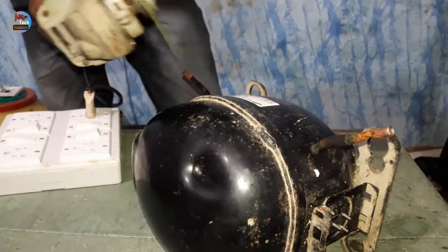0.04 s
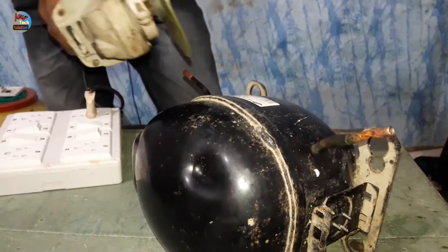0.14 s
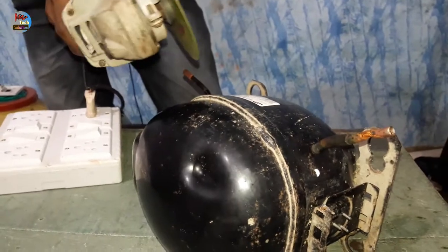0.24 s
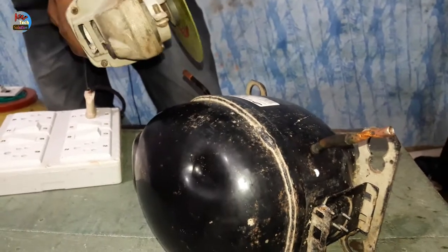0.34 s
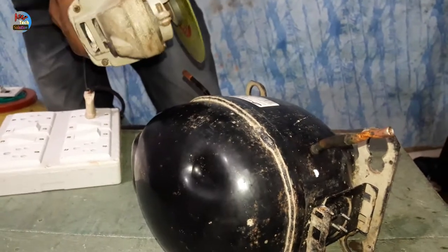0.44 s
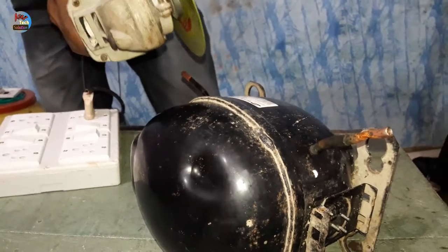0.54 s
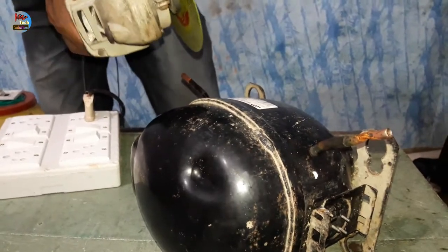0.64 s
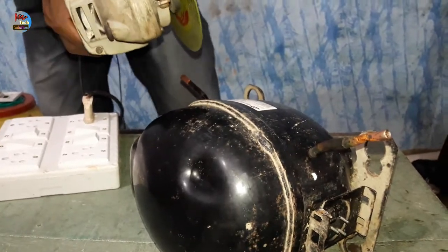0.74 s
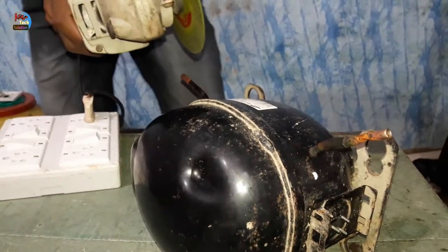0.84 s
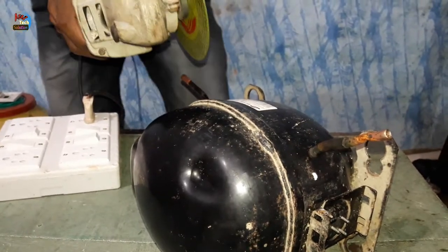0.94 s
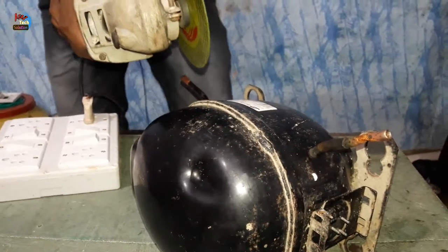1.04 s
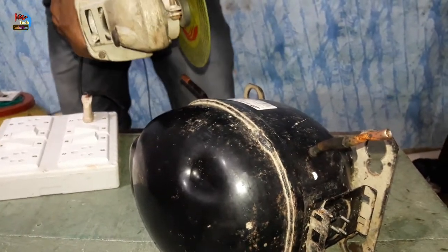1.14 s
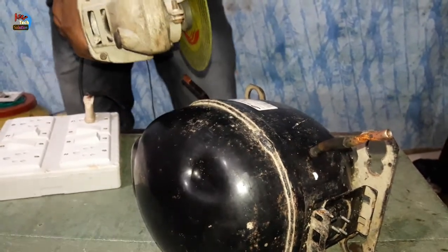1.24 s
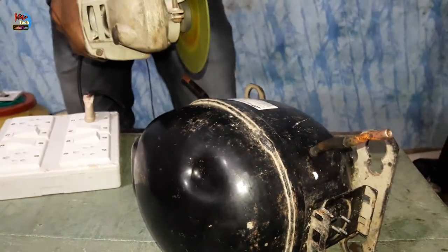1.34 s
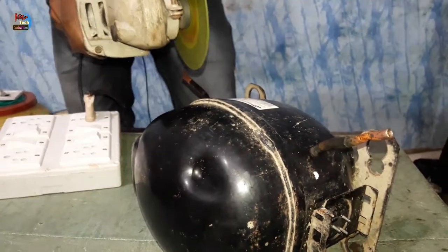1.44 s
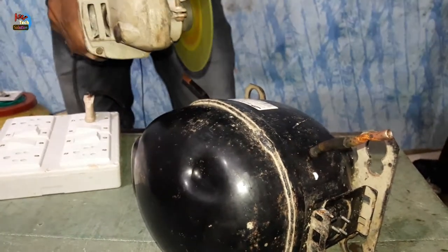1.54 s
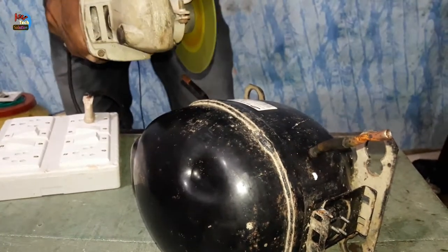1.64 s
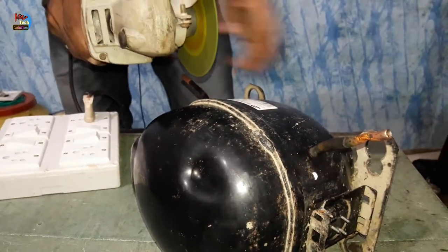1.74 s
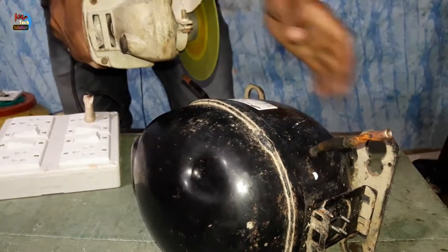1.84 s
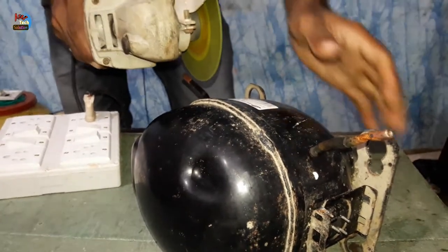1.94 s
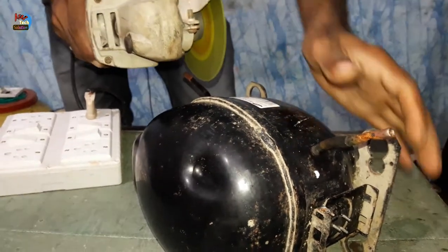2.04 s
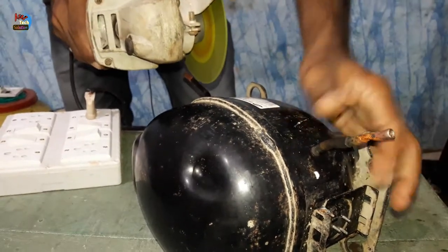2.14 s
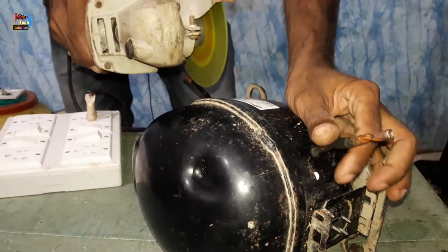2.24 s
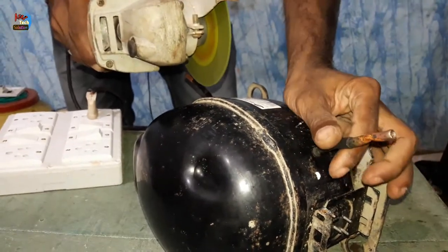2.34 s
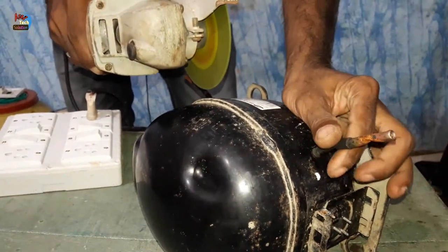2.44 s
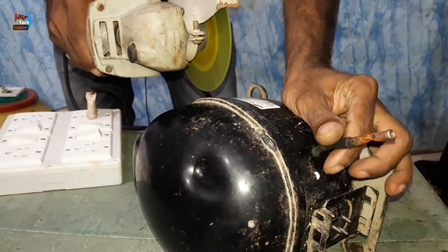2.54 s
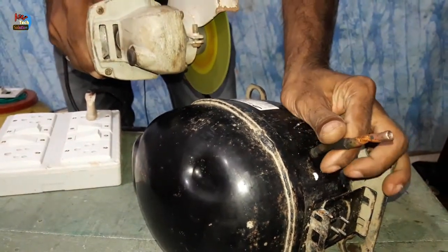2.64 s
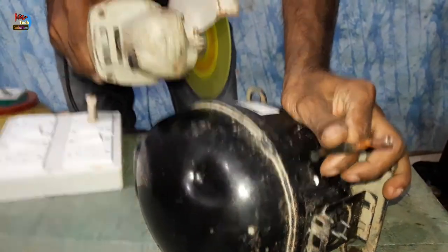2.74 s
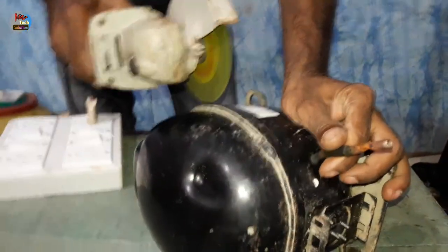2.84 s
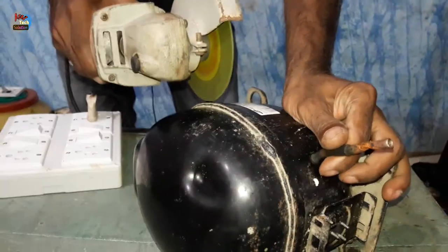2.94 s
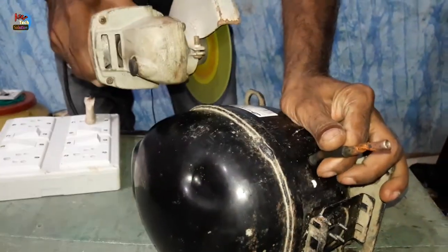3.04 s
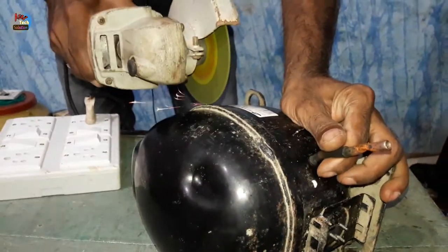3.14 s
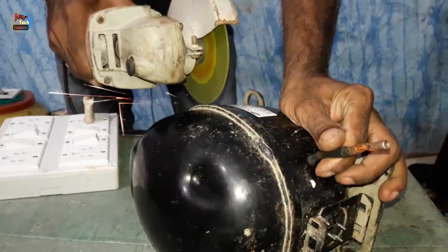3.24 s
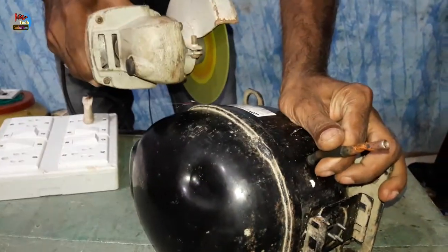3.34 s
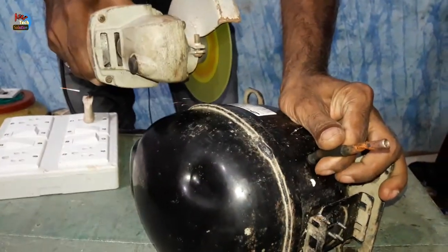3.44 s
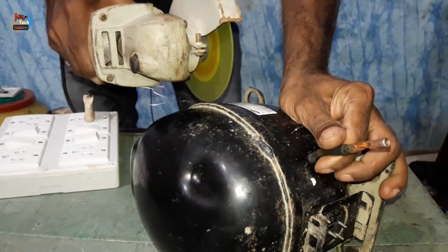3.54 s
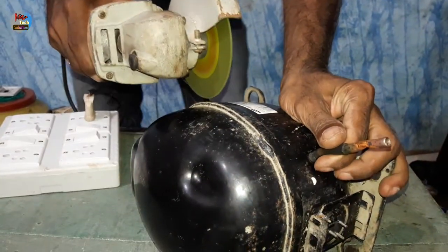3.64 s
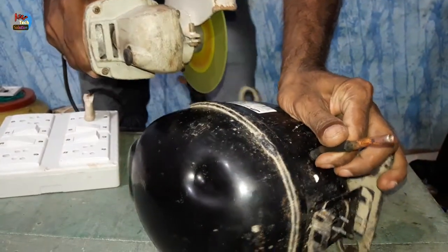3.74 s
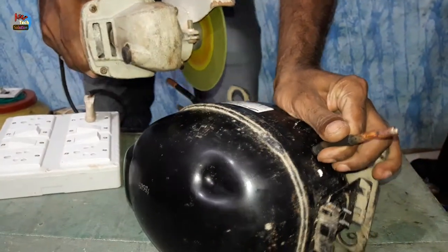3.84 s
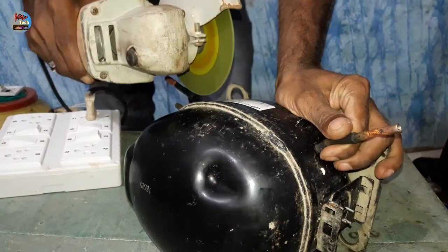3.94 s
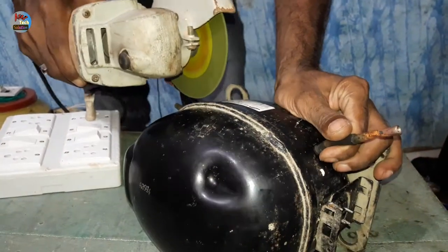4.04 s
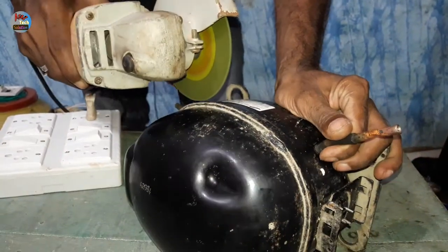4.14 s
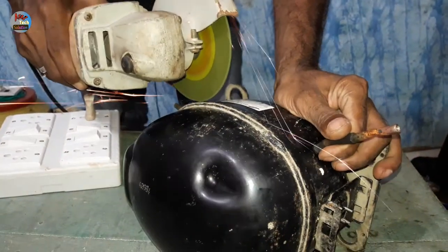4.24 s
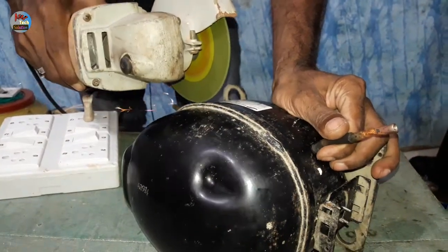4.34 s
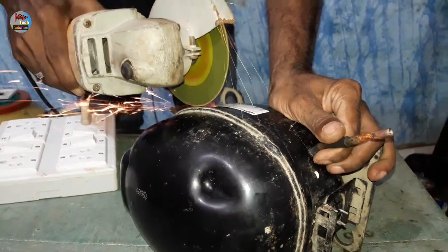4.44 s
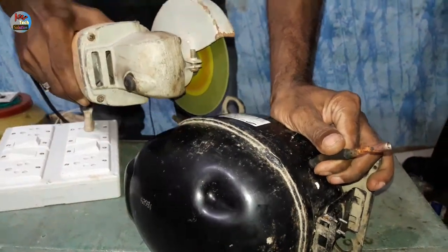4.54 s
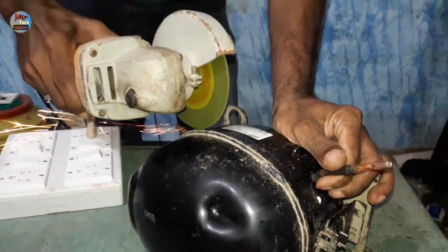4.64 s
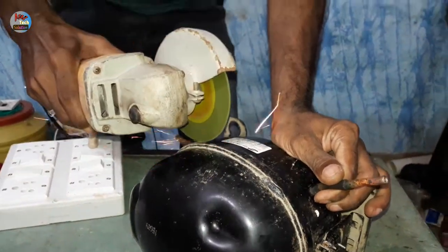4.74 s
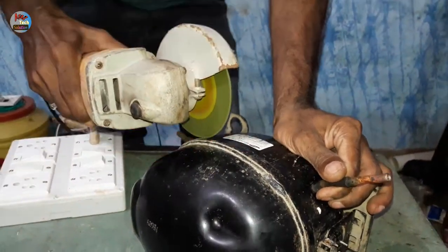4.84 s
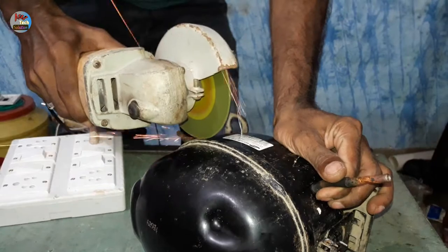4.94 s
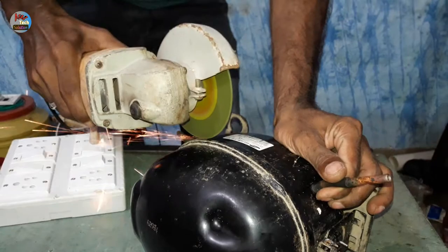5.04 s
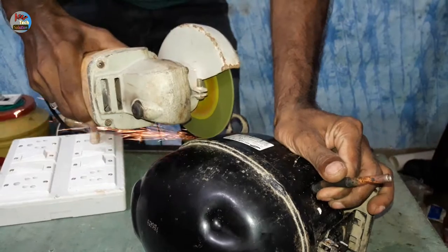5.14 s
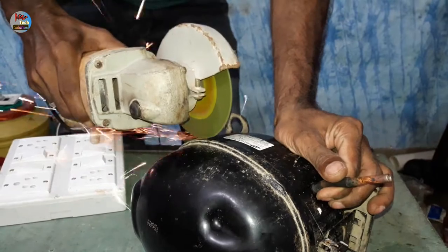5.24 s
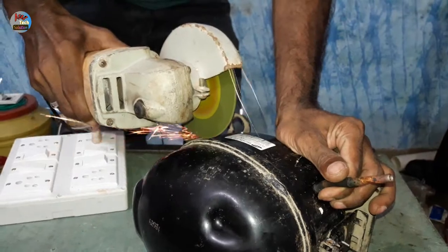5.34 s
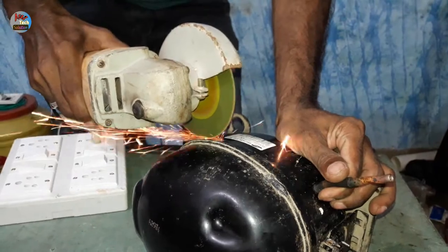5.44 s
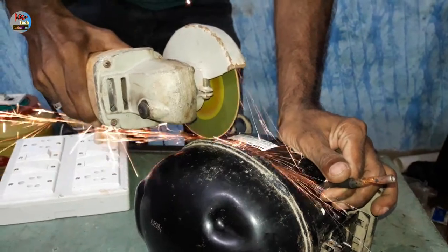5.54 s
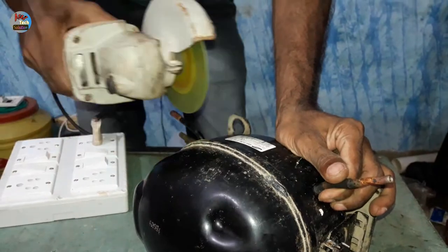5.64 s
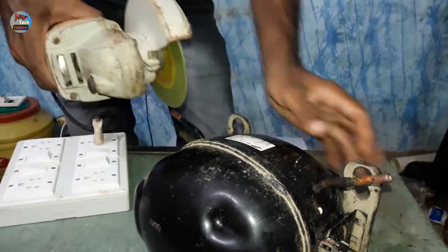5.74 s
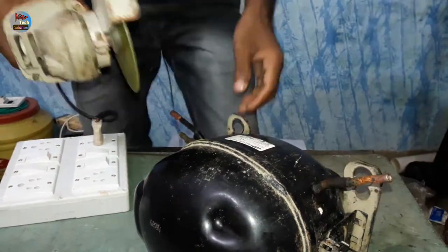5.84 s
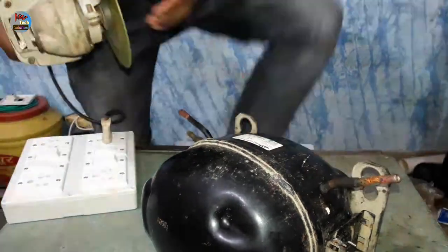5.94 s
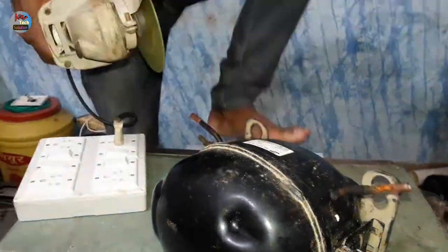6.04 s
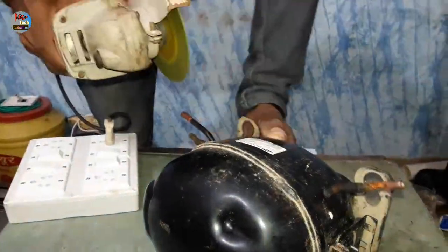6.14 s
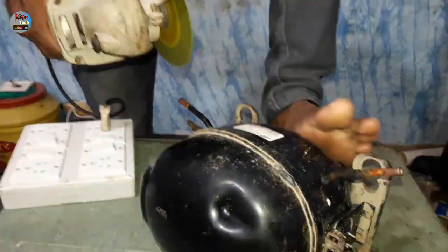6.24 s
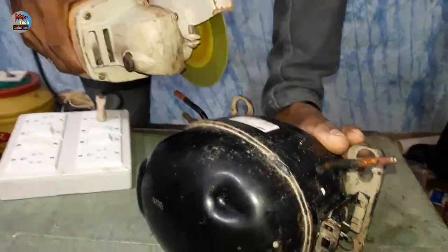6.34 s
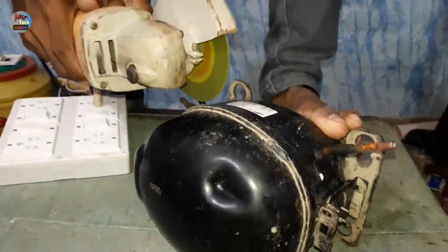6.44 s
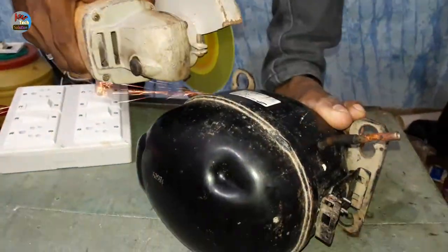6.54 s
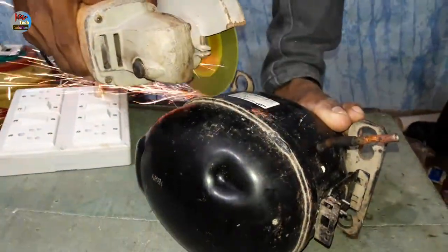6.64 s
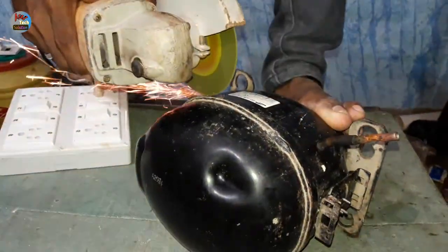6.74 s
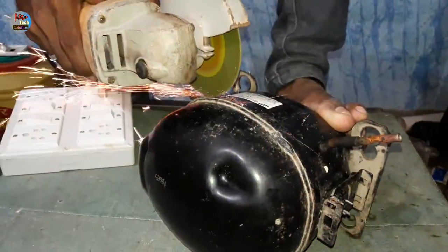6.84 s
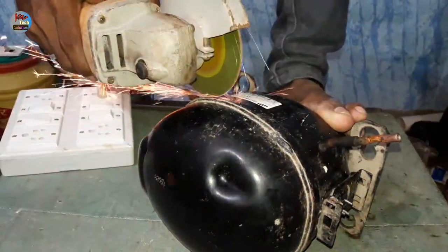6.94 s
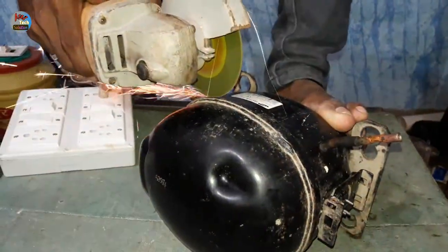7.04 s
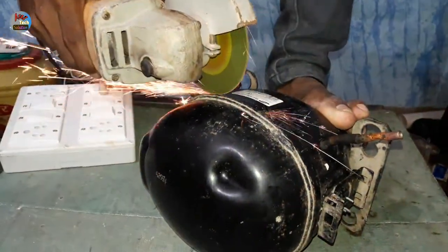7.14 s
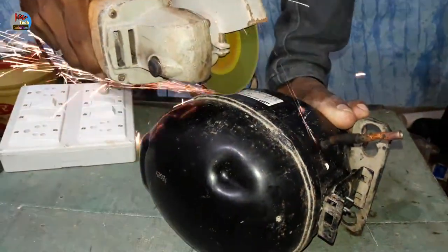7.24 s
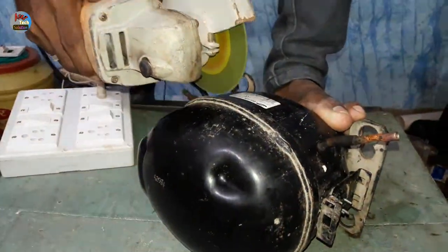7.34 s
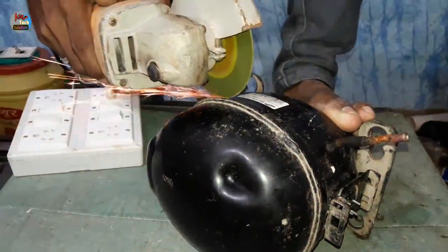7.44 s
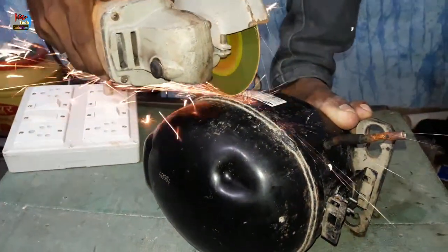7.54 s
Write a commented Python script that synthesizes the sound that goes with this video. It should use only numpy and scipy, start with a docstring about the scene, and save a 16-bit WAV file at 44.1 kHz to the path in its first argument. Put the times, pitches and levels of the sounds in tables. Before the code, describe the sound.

In a humming room, an angle grinder snarls awake, whines freely, chirps and bumps, then grazes and finally grinds harshly into a thick steel shell.

```python
"""On a workbench in a humming room, small knocks are heard, then an angle grinder starts over a thick steel shell.
The motor snarls at about 100 Hz and spins up to a whine made of sines, in a rush of filtered noise from fan and gears.
The gears chirp in short noise bursts. The disc grazes the shell, then cuts deep: random grit rings the steel,
and the motor sags under the load. An echo off the shell colours the rush as the tool moves.
Once, the level dips almost to nothing for an instant."""
import sys
import numpy as np
from scipy import signal
from scipy.fft import rfft, irfft
from scipy.io import wavfile
from scipy.ndimage import map_coordinates

SR = 44100
rng = np.random.default_rng(int(sys.argv[2]) if len(sys.argv) > 2 else 0)


def wrap_up_sound(samples):
    """Save the sound to the file named by the first command line argument, as 16-bit audio."""
    columns = np.atleast_2d(samples).T
    # keep every value between -1 and 1, then stretch to whole-number steps
    tamed = np.clip(columns, -1, 1)
    steps = np.round(tamed * 32767).astype(np.int16)
    wavfile.write(sys.argv[1], SR, steps)


N = 335160
T = np.arange(N) / SR   # time of each sample [s]
FREQ = np.maximum(np.arange(N // 2 + 1) * SR / N, 1)   # frequency of each spectrum bin [Hz]
SWITCH_ON_S = 1.269
MAINS_HZ = 49.65


def from_db(db):
    """Turn decibels into gain."""
    return 10 ** (np.asarray(db) / 20)


def rms_one(x):
    """Scale a signal to rms 1."""
    return x / np.sqrt(np.mean(x ** 2) + 1e-20)


def in_time(rows):
    """Read each column of a curve at every sample; the first column is time."""
    times, *columns = np.transpose(rows)
    return [np.interp(T, times, column) for column in columns]


def drift(rate):
    """Smooth random wandering of rms 1 that changes about rate times a second."""
    spectrum = rfft(rng.standard_normal(N))
    return rms_one(irfft(spectrum / (1 + (FREQ / rate) ** 2), N))


def noise(spectrum):
    """Noise of rms 1 with a given spectrum, falling away beyond its ends."""
    hz, db = np.transpose(spectrum)
    low_end = 1 / (1 + (hz[0] / FREQ / 2) ** 4)
    high_end = 1 / (1 + (FREQ / hz[-1] / 2) ** 4)
    shape = from_db(np.interp(np.log(FREQ), np.log(hz), db))
    return rms_one(irfft(rfft(rng.standard_normal(N)) * low_end * high_end * shape, N))


def resonate(x, hz, width):
    """One resonance, like a struck part that rings, with gain 1 at its peak."""
    r = np.exp(-np.pi * width / SR)
    top = np.array([1, 0, -1]) * (1 - r * r) / 2
    bottom = [1, -2 * r * np.cos(2 * np.pi * hz / SR), r * r]
    return signal.lfilter(top, bottom, x + 1e-18)


def narrow_noise(hz, width):
    """Noise of rms 1 around one pitch: two resonances in a row make the flanks steep."""
    once = resonate(rng.standard_normal(N), hz, width)
    return rms_one(resonate(once, hz, width))


def swells(times, levels_db, rise_s):
    """Loudness curve of short bursts that peak rise_s after they start and soon die."""
    out = np.zeros(N + SR)
    age = np.arange(SR // 5) / SR / rise_s
    burst = age * np.exp((1 - age ** 2) / 2)
    for s, db in zip(times, levels_db):
        first = int(s * SR)
        out[first:first + len(age)] += from_db(db) * burst
    return out[:N]


def held(start, end, attack_s, release_s):
    """Loudness curve that rises from start, holds until end and is then released."""
    rising = (T - start) / attack_s
    falling = 1 - (T - end) / release_s
    return np.clip(np.minimum(rising, falling), 0, 1)


# steady hum of the quiet room: (frequency [Hz], level before the start [dB rms])
HUM_TONES = [(48.8, -67), (122, -73.5), (196, -73), (274.5, -72), (344.5, -68.5), (489.9, -64.5),
             (538.3, -60.5), (3967, -75.5), (4016, -79.5), (5141, -81)]
# faint high tones that join just before the start: (frequency [Hz], level before the start [dB rms])
LATE_HIGH_TONES = [(2794, -76), (3138, -78), (6320, -81)]
# spectrum of the soft background noise: (frequency [Hz], relative level [dB per Hz])
FLOOR_SPECTRUM = [(30, -22), (75, -6.5), (230, -11), (480, -3.5), (660, -13.5), (2300, -24.5),
                  (3600, -21.5), (4400, -23), (5200, -26.5), (9000, -28), (15000, -42)]


def room(floor_db=-60.5, waver=0.092, late_from_s=0.95):
    """Mains hum and thin steady tones, their phases wavering a little, over a soft noise floor."""
    hum = sum(from_db(db) * np.sin(2 * np.pi * hz * T + waver * np.sqrt(hz / 100) * drift(3.5))
              for hz, db in HUM_TONES)
    late = sum(from_db(db) * np.sin(2 * np.pi * hz * T + drift(6.6)) for hz, db in LATE_HIGH_TONES)
    late = late * np.clip((T - late_from_s) * 10, 0, 1)
    return np.sqrt(2) * (hum + late) + from_db(floor_db) * noise(FLOOR_SPECTRUM)


# spectrum of the rustle: (frequency [Hz], relative level [dB per Hz])
RUSTLE_SPECTRUM = [(410, -38), (700, -2), (827, -11), (928, -5), (1400, -5), (1850, -4), (3260, -11),
                   (4850, -8), (15000, -28)]
# handling knocks: (time [s], level [dB], pitch [Hz], width [Hz], length [s])
HANDLING_KNOCKS = [(0.389, -54.5, 3370, 600, 0.0059), (.39, -60, 5500, 900, .012),
                   (0.658, -54.5, 2030, 400, 0.018), (.943, -64, 7000, 5000, .012),
                   (1.146, -50.5, 950, 500, 0.022), (1.15, -69, 2000, 900, .015)]


def handling(rustle_db=-58, from_s=.59, to_s=.77, attack_s=.07, fade_db_per_s=58):
    """A rustle of noise and small pitched knocks as the tool is brought into place."""
    fade_db = fade_db_per_s * np.maximum(T - to_s, 0)
    rustle = np.clip((T - from_s) / attack_s, 0, 1) * from_db(rustle_db - fade_db)
    knocks = sum(swells([s], [db], length / 2) * narrow_noise(hz, width)
                 for s, db, hz, width, length in HANDLING_KNOCKS)
    return rustle * noise(RUSTLE_SPECTRUM) + knocks


# early echoes from nearby surfaces: (delay [s], gain [factor])
SURFACE_ECHOES = [(.0031, 0.005), (.0067, 0.074), (0.0121, -0.071), (0.0153, .12), (.0213, -0.059)]


def workshop(x):
    """Bench, body and wall send back early echoes: delayed, weaker copies of the sound."""
    return x + sum(gain * np.interp(T - lag, T, x, left=0) for lag, gain in SURFACE_ECHOES)


# the disc is put to the steel:
# (start [s], end [s], relative force [dB], cut depth [0-1], speed lost at full lean [turns per s])
STEEL_PASSES = [(3.947, 4.13, -42, .2, 2), (4.229, 4.52, -35, .05, 38.6), (4.649, 4.868, -36.5, .1, 33),
                (4.928, 5.171, -37, .15, 33), (5.151, 5.664, -35, 0, 37), (6.461, 6.711, -36, 0.8, 12.33),
                (6.7, 7.313, -30.5, 0.86, 80), (7.338, 7.52, -38.5, 0.98, 41), (7.508, 7.7, -33.5, 1, 140)]
BITE_S, LIFT_S = 0.0457, 0.02996   # attack and release of a pass


def contact():
    """Pressure of the disc on the steel (as a gain), and the cut depth averaged by pressure."""
    each = [from_db(db) * held(start, end, BITE_S, LIFT_S) for start, end, db, _, _ in STEEL_PASSES]
    pressure = sum(each)
    depth = sum(p * row[3] for p, row in zip(each, STEEL_PASSES)) / (pressure + 1e-9)
    return pressure, depth


# speed the motor would hold with no load, faster once the tool is lifted: (time [s], speed [turns per s])
NO_LOAD_SPEED = [(3.2, 514), (5.85, 505), (5.99, 496), (6.14, 534), (6.3, 559)]


def motor(spin_up_s=.183, spin_lead_s=.015, lean_s=.22, inertia_s=0.0603):
    """Speed, and slip (the share still to gain): a run-up, then a lagging sag as the hand leans in."""
    free, = in_time(NO_LOAD_SPEED)
    # the lead gives the run-up a small head start
    slip = np.exp(-np.maximum(T - SWITCH_ON_S + spin_lead_s, 0) / spin_up_s)
    drag = 0
    for start, end, _, _, sag in STEEL_PASSES:
        lean = 1 - np.exp(-np.maximum(T - start, 0) / lean_s)
        drag = drag + sag * held(start, end, BITE_S, LIFT_S) * lean
    keep = np.exp(-1 / (inertia_s * SR))
    lost_speed = signal.lfilter([1 - keep], [1, -keep], drag)
    return free * (1 - slip) - lost_speed, slip


def clunk(at_s=1.277, clunk_db=-27, clunk_hz=780, rise_s=0.0081, shudder_db=-35, shudder_s=0.038):
    """The gears take up their slack with a dull knock, and the housing shudders briefly."""
    knock = swells([at_s], [clunk_db], rise_s)
    shudder = swells([at_s], [shudder_db], shudder_s)
    return (knock + shudder) * narrow_noise(clunk_hz, 850)


# the disc bumps the steel: (time [s], relative level [dB])
STEEL_BUMPS = [(2.17, -36), (2.245, -34), (2.959, -35), (3.099, -29.5), (3.234, -28), (3.306, -27),
               (3.95, -28), (4.504, -40), (4.795, -29), (4.84, -29), (5.565, -35), (6.438, -31.5),
               (6.745, -33)]


def thuds(thud_db=-18.5, rise_s=0.0092, bench_hz=170):
    """Each bump also thuds through the shell into the bench as a low burst of noise."""
    return from_db(thud_db) * swells(*np.transpose(STEEL_BUMPS), rise_s) * narrow_noise(bench_hz, 290)


def free_ring(ring_db=-39.0, from_s=5.88, to_s=6.53, attack_s=.15, release_s=0.072,
              low_db=-5, high_hz=6200, low_hz=2280):
    """Lifted off the steel, the shaking disc rings in two of its modes."""
    level = held(from_s, to_s, attack_s, release_s) * from_db(ring_db + 1.74 * drift(50))
    return level * (narrow_noise(high_hz, 580) + from_db(low_db) * narrow_noise(low_hz, 290))


# two squeaking modes of the rim:
# (pitch [Hz], relative level when grazing [dB], share lost deep in the cut [0-1], fit rate [per s])
RIM_SQUEAKS = [(6410, -9, 1, 67), (2020, -6, 0.58, 35)]


def squeaks(pressure, depth, threshold=0.56, jitter=1.3):
    """Mostly while it only grazes, the rim sticks and slips in short squeaks."""
    total = 0
    for hz, db, lost, rate in RIM_SQUEAKS:
        fits = np.clip(drift(rate) - threshold, 0, 1.5)
        tone = np.sin(2 * np.pi * hz * T + jitter * drift(90))
        total = total + from_db(db) * np.clip(1 - lost * depth, 0, 1) * fits * tone
    return pressure * total


# fits of gear chatter, one chirp in each mains cycle:
# (start [s], length [s], relative upper chirp level [dB], relative lower chirp level [dB])
CHATTER_FITS = [(2.0207, .11, -33, -22), (2.155, .01, -33, -18), (2.18, .15, -40, -19.5),
                (2.96, .01, -32, -19), (3.084, .03, -37, -22), (3.1562, .01, -28, -22),
                (3.2276, .01, -33, -13.5), (3.3, .01, -30, -14), (3.7898, .01, -40, -22),
                (3.872, .01, -28, -13)]


def chirps(upper_db=-8, lower_db=-7, stray_upper_db=-32, stray_lower_db=-28, uneven_db=2,
           rise_s=0.0044, lead_s=0.0037, stray_from_s=1.88, strays_per_s=14):
    """The gears chatter in short chirps in time with the mains, in two bands about an octave apart."""
    fits = [(s, upper, lower) for start, length, upper, lower in CHATTER_FITS
            for s in np.arange(start, start + length, 1 / MAINS_HZ)]
    # stray chirps come by chance until the first pass
    beats = np.arange(stray_from_s, STEEL_PASSES[0][0], 1 / MAINS_HZ)
    chance = rng.random(len(beats))
    strays = [(s, stray_upper_db, stray_lower_db) for s, draw in zip(beats, chance)
              if draw < strays_per_s / MAINS_HZ]
    times, upper, lower = np.transpose(fits + strays)
    high = rms_one(narrow_noise(12700, 300) + 1.5 * narrow_noise(12330, 400))
    low = rms_one(narrow_noise(6254, 260) + .5 * narrow_noise(5620, 403.6))
    high_chirps = swells(times - lead_s, upper + upper_db, rise_s) * high
    low_chirps = swells(times - lead_s, lower + lower_db, rise_s) * low
    return from_db(uneven_db * drift(22)) * (high_chirps + low_chirps)


# resonances of disc and shell:
# (pitch [Hz], width [Hz], relative level when grazing [dB], relative level deep in the cut [dB])
STEEL_RINGS = [(127, 98, -16, -19), (488, 51, 1, 1.5), (815, 170, -4.5, -5.5), (2006, 47, 1, -1.5),
               (2320, 67.5, -17, -2), (3430, 99, -3, -3), (3600, 350, 0, -7.5), (4530, 280, -7.5, -6.5),
               (5604, 220, 2, 4.5), (5890, 400, -3, 0.5), (6350, 160, 5, -0.5), (6650, 250, -18, -21),
               (10100, 1200, -28, -24), (11500, 380, -19, -19), (13000, 240, -14.5, -23),
               (13850, 400, -35, -20)]


def grinding(turns, pressure, depth, grains_per_s=9000, grain_db=3.0, runout=0.15, judder_db=2.0,
             bump_rise_s=0.0035, gear_ratio=3.6, steel_db=13.0):
    """Grit strikes the steel, hardest once in each turn of the disc, and rings disc and shell."""
    hits = (rng.random(N) < grains_per_s / SR) * rng.choice([-1, 1], N)
    grit = rms_one(hits * from_db(grain_db * np.minimum(rng.exponential(1, N), 4)))
    # the gears make the disc turn slower than the motor
    disc_turn = 1 + runout * np.sin(2 * np.pi * turns / gear_ratio)
    force = pressure * from_db(judder_db * drift(74)) * disc_turn
    force = force + swells(*np.transpose(STEEL_BUMPS), bump_rise_s)
    depth = np.clip(depth, 0, 1)
    rings = 0
    for k, (hz, width, graze, deep) in enumerate(STEEL_RINGS):
        strike = grit * force * from_db(graze + depth * (deep - graze))
        rings = rings + (-1) ** k * resonate(strike, hz, width)   # neighbours alternate in sign
    return from_db(steel_db) * rings


# spectra of the roar, rush and hiss: (frequency [Hz], relative level [dB per Hz])
ROAR_SPECTRUM = [(30, -52), (70, -25.5), (150, -26.5), (260, -13.5), (420, -8.5), (580, -1), (820, 5),
                 (1100, -3.5), (1600, -4.5), (2600, -16)]
RUSH_SPECTRUM = [(700, -17.5), (1400, -2), (2100, -0.5), (2900, 0.5), (3600, 0.5), (4400, 1), (5100, -0.5),
                 (5800, 3.5), (6600, -1), (8000, -18.5)]
HISS_SPECTRUM = [(4000, -26), (6000, -5), (6900, 3), (7700, 5.5), (8400, 3.5), (9200, 5), (9900, 3),
                 (10600, -4.5), (11600, -4.5), (12700, -3), (13400, -21), (15700, -18)]
# loudness of the air noise: (time [s], relative level [dB])
AIR_LOUDNESS = [(1.5, 0.5), (1.68, 5), (1.85, 2.5), (2.35, 0), (3.9, -0.25), (3.99, -4.5), (6.05, -5.5),
                (6.22, -4.5), (7.6, -4.5)]
# extra path by way of the shell: (time [s], echo delay [ms])
SHELL_ECHO_DELAY = [(1.5, 0.24), (1.65, 0.275), (2.3, 0.3), (4.6, 0.3), (5.8, 0.31), (5.9, 0.31),
                    (5.99, 0.2), (6.25, 0.25), (6.4, 0.268), (6.5, .312), (7.6, 0.315)]


def air(slip, roar_db=-35.0, rush_db=-28.5, hiss_db=-33.5, roar_loss_db=28, rush_loss_db=9,
        hiss_loss_db=34, flutter_db=1.16, echo=.38):
    """Fan and gears roar and hiss as the speed builds; the echo off the shell combs the noise."""
    loudness_db, = in_time(AIR_LOUDNESS)
    roar = from_db(roar_db - roar_loss_db * slip) * noise(ROAR_SPECTRUM)
    rush = from_db(rush_db - rush_loss_db * np.sqrt(slip)) * noise(RUSH_SPECTRUM)
    hiss = from_db(hiss_db - hiss_loss_db * slip) * noise(HISS_SPECTRUM)
    direct = (roar + rush + hiss) * from_db(loudness_db + flutter_db * drift(146))
    lag_ms, = in_time(SHELL_ECHO_DELAY)
    heard_late = map_coordinates(direct, [np.arange(N) - lag_ms * SR / 1000], order=3)
    return (direct + echo * heard_late) / np.sqrt(1 + echo ** 2)


# spectrum of the starting snarl: (frequency [Hz], relative level [dB per Hz])
SNARL_SPECTRUM = [(100, -40), (300, -13), (700, 4), (1200, -4.5), (2200, -0.5), (3300, 0.5), (4300, 5.5),
                  (4800, 0), (5300, 2), (6300, -1.5), (7000, -14), (10000, -13), (12800, -34), (15000, -44)]


def snarl(turns, slip, surge_db=-28.0, stall_slip=0.25, running_db=-27, sharpness=1.2, uneven_db=-1.0,
          first_peak_s=1.2712, mesh_db=-5, mesh_spread_hz=230, housing_db=-6, housing_hz=4330, teeth=11):
    """Each mains half wave kicks the motor, less as it speeds up; rising gear noise rings the housing."""
    beat = np.cos(2 * np.pi * 2 * MAINS_HZ * (T - first_peak_s))
    kicks = rms_one(np.exp(sharpness * beat))
    mesh = rms_one(drift(mesh_spread_hz) * np.sin(2 * np.pi * teeth * turns))
    gathering = np.clip((T - SWITCH_ON_S) * 8, 0, 1)   # the teeth strike harder as they gather speed
    gears = from_db(mesh_db) * mesh + from_db(housing_db) * narrow_noise(housing_hz, 320)
    current = np.tanh(slip / stall_slip) + from_db(running_db)
    level = current * from_db(surge_db + uneven_db * drift(80))
    return level * kicks * (1.09 * noise(SNARL_SPECTRUM) + gathering * gears)


# tones of the whine: (multiple of the motor speed [factor], relative level [dB])
WHINE_TONES = [(1, 0.94), (2, -19), (3, -15), (4, -16)]
# loudness of the whine as the tool is moved about: (time [s], relative level [dB])
WHINE_LOUDNESS = [(1.5, -43.5), (1.58, -36), (1.7, -28.5), (2.38, -33.5), (4.35, -35.5), (4.39, -30),
                  (4.54, -36), (4.59, -30.5), (4.66, -38), (4.85, -31.5), (5.53, -36.5), (5.78, -31.5),
                  (5.83, -36), (6.68, -44.5), (7.14, -33), (7.36, -39.5), (7.43, -35), (7.6, -36.5)]
# thin whistles of the unloaded motor:
# (multiple of the motor speed [factor], level [dB rms], start [s], end [s])
THIN_WHISTLES = [(31, -58, 1.62, 2.2), (28, -64, 1.85, 3.95), (2, -51, 6.1, 6.65)]


def whine(turns, slip, pressure, whine_db=-3.0, flutter=0.12, wobble=0.088, load_wobble=0.27,
          full_load_db=-36):
    """From about half speed the unbalanced motor sings at multiples of its speed, shakier under load."""
    load = np.clip(pressure / from_db(full_load_db), 0, 1.5)
    level_db, = in_time(WHINE_LOUDNESS)
    phase = 2 * np.pi * turns + (wobble + load_wobble * load) * drift(31)
    tone = sum(from_db(db) * np.sin(k * phase) * (1 + flutter * (1 + load) * drift(38))
               for k, db in WHINE_TONES)
    thin = 0
    for k, db, start, end in THIN_WHISTLES:
        fade = np.clip(np.minimum(T - start, end - T) * 10, 0, 1)
        thin = thin + from_db(db) * np.sin(k * 2 * np.pi * turns + drift(40)) * fade
    unbalance = np.clip((.6 - slip) / .15, 0, 1)
    return np.sqrt(2) * (from_db(level_db + whine_db) * unbalance * tone + thin)


def scene(room_drop_db=-16, gap_s=3.9245, gap_length_s=.006, recover_s=0.018):
    """The grinder joins the room, which is quieter from then on; the level dips once for an instant."""
    speed, slip = motor()
    pressure, depth = contact()
    turns = np.cumsum(speed) / SR
    running = np.clip((T - SWITCH_ON_S) * 1000, 0, 1)
    quiet = (room() + handling()) * from_db(room_drop_db * running)
    tool = air(slip) + snarl(turns, slip) + clunk() + chirps() + free_ring()
    steel = grinding(turns, pressure, depth) + squeaks(pressure, depth) + thuds()
    singing = running * whine(turns, slip, pressure)
    mix = singing + workshop(running * (tool + steel)) + quiet
    recovery = np.clip((T - gap_s - gap_length_s) / recover_s, .02, 1)
    dip = np.where(T < gap_s, 1, recovery)
    return np.tile(mix * dip, (2, 1))   # the same sound left and right


def record(dry, top=0.26, cutoff_hz=15620):
    """Peaks are rounded off below top, then a steep filter removes the highest treble."""
    rounded = dry / (1 + (dry / top) ** 4) ** (1 / 4)
    lowpass = signal.ellip(12, .1, 80, cutoff_hz, fs=SR, output="sos")
    return signal.sosfilt(lowpass, rounded)


dry = scene()
out = record(dry)
wrap_up_sound(out)
```